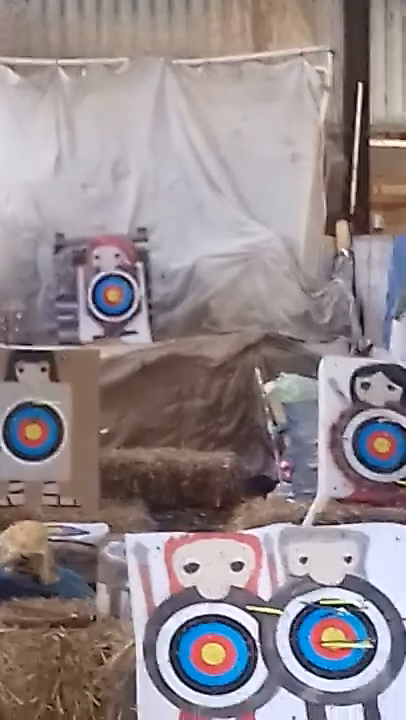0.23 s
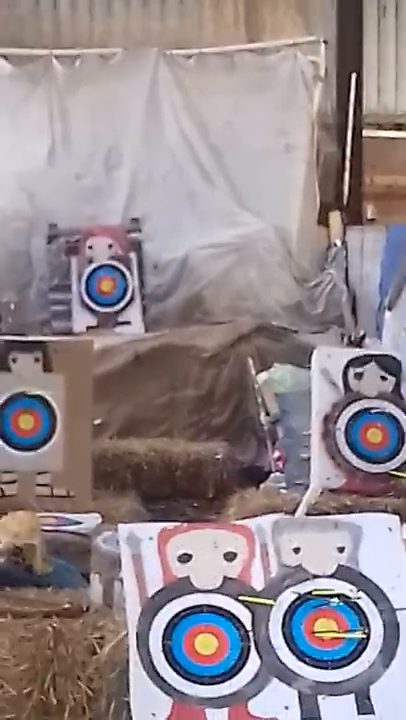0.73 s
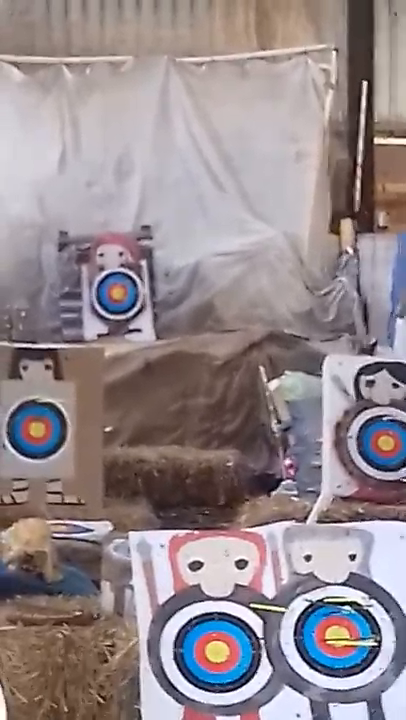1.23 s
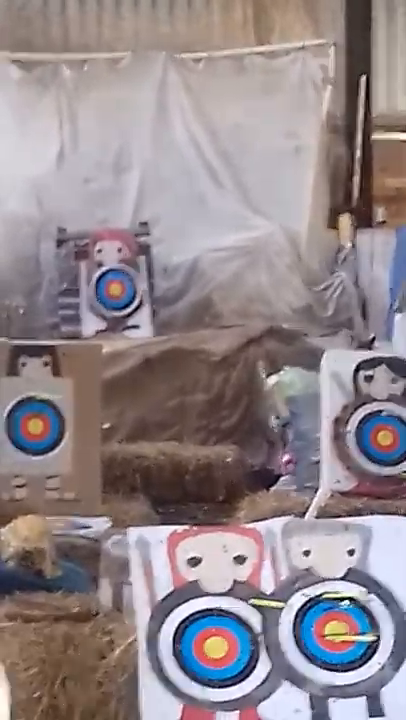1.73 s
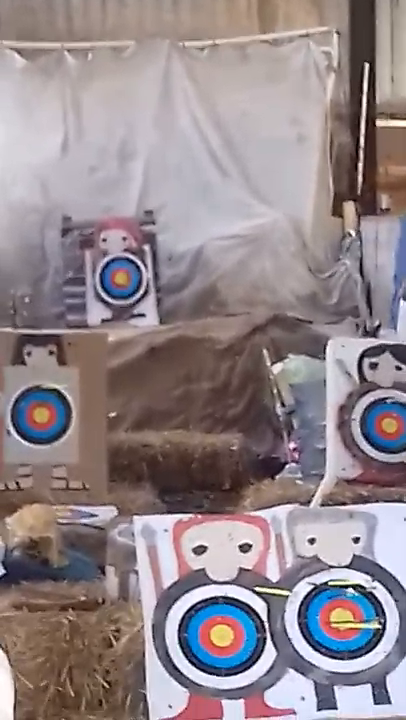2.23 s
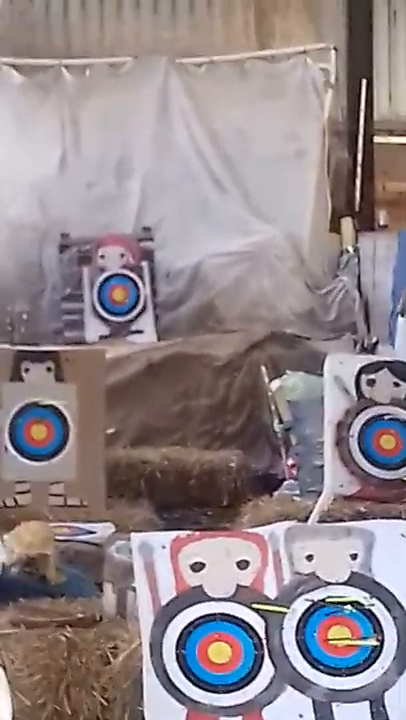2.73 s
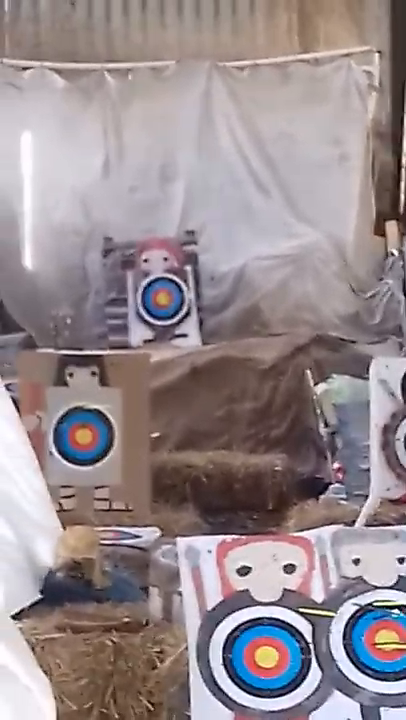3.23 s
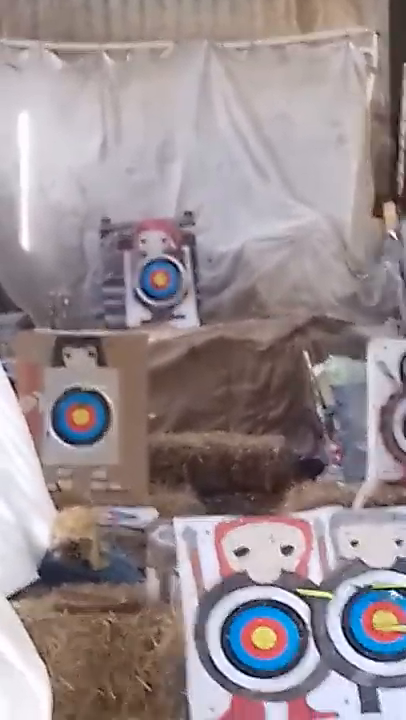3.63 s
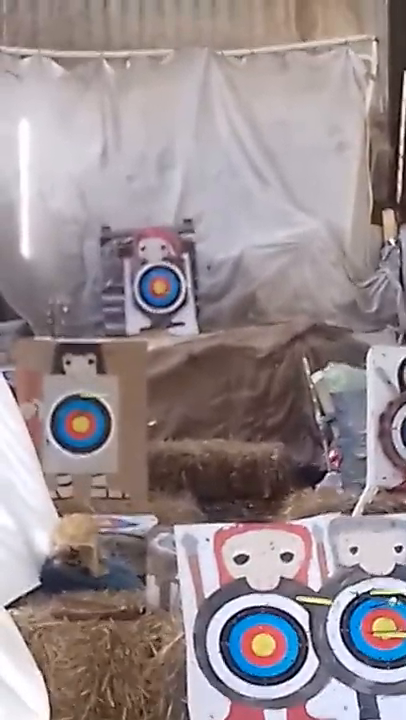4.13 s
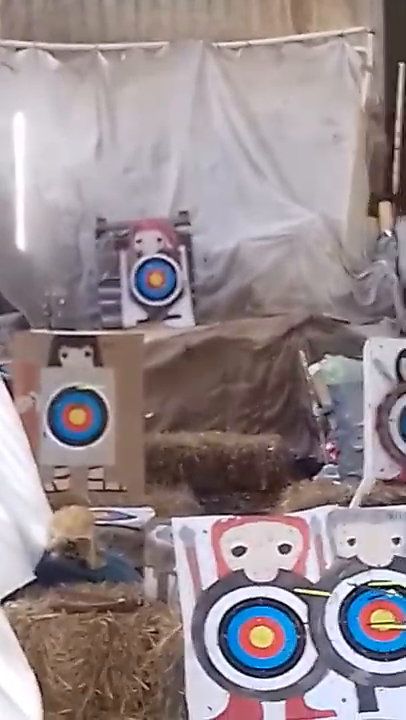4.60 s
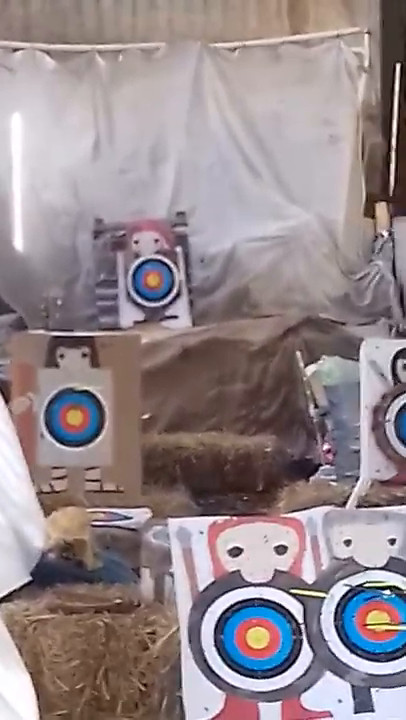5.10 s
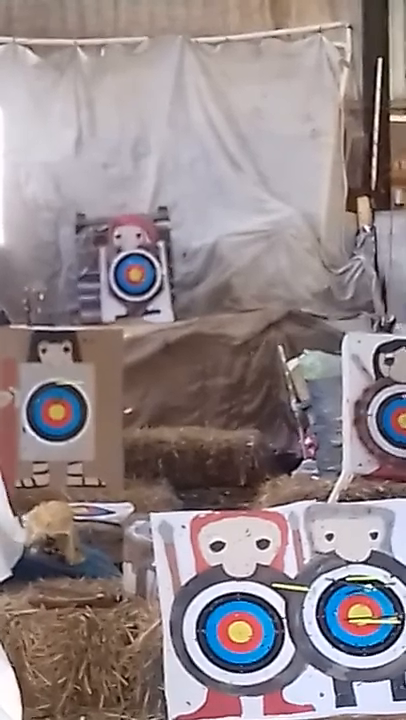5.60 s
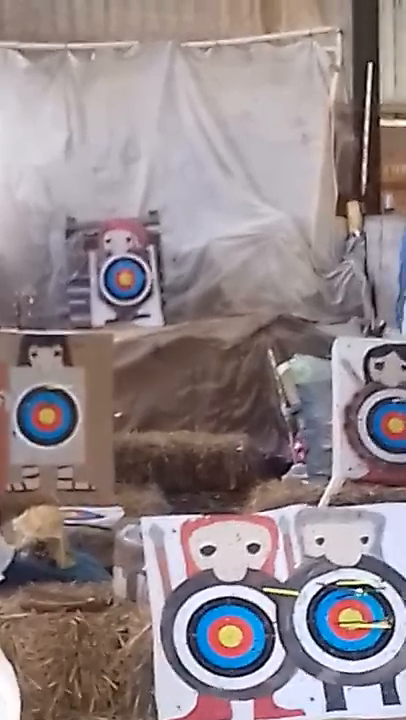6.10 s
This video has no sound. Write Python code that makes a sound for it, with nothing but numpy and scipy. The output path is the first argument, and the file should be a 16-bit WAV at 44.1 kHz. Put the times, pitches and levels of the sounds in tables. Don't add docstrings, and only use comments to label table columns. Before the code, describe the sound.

A quiet barn archery range, miked from some metres away, with steady hiss and a low, muffled traffic drone throughout; tyres faintly swish past near 0.6, 2.5, 3.3 and 6.2 s. At 1.25 s arrow shafts tick and clack softly. At 2.53 s a nock snaps onto the string with a light ring. At 2.8 s a wooden frame is knocked sharply, ringing hollow, with a much softer rebound at 2.87 s. Tiny dry ticks scatter from 3.0 to 3.5 s. Around 4.1 s a faint low motor hum comes in, and a thin string creak grows until 4.8 s. At 5.25 s the bow releases with a crisp crack and brief airy rush, the string slaps at 5.34 s, and small clicks follow. At 5.77 s the arrow thwacks cardboard, by far the loudest sound, with a short board ring and roughly half-second echo. Small ticks follow at 6.16 and 6.32 s.

```python
import sys
import numpy as np
from scipy import signal
from scipy.fft import rfft, irfft, next_fast_len
from scipy.io import wavfile
from scipy.ndimage import uniform_filter1d

SR = 44100
rng = np.random.default_rng(int(sys.argv[2]) if len(sys.argv) > 2 else 0)


def decibels_to_gain(level_db):
    exponent = np.asarray(level_db, float) / 20
    return 10 ** exponent


def file_out(sig):
    cols = np.atleast_2d(sig).T
    lim = np.clip(cols, -1, 1)
    pcm = np.round(lim * 32767).astype(np.int16)
    wavfile.write(sys.argv[1], SR, pcm)


N = 280123

# (time [s], level [dB], rise [ms], fall [ms], barn share [dB])
THWACK = (5.7697, -21.5, 4.0, 11.0, 2)
# (time [s], level [dB], rise [ms], fall [ms], barn share [dB])
RELEASE = (5.249, -32, 10.0, 4.0, -1.5)


def level(x, db):
    return x * decibels_to_gain(db) / np.sqrt(np.mean(x ** 2))


def curve(table, hz):
    f, value = np.transpose(table)
    return np.interp(np.log(hz + 1), np.log(f), value)


def shape(x, gain):
    n = next_fast_len(x.shape[-1])
    hz = np.arange(n // 2 + 1) * SR / n
    return irfft(rfft(x, n) * gain(hz), n)[..., :x.shape[-1]]


def bands(x, centres):
    def gain(f):
        octaves_away = np.log2((f + 1) / centres[:, None])
        return np.cos(np.pi / 2 * np.clip(octaves_away, -1, 1)) ** 2
    return shape(x, gain)


def causal(colour, size=1024):
    hz = np.arange(size + 1) * SR / (2 * size)
    cepstrum = irfft(np.log(decibels_to_gain(curve(colour, hz))))
    cepstrum[1:size] *= 2
    cepstrum[size + 1:] = 0
    return irfft(np.exp(rfft(cepstrum)))[:size]


def walk(rate):
    k = int(SR / rate)
    steps = np.repeat(rng.standard_normal(N // k + 1), k)
    return 1.3 * uniform_filter1d(uniform_filter1d(steps, k), k)[:N]


def swell(s, db, rise, hold, fall):
    t = np.arange(N) / SR - s
    return db - 20 * np.maximum(0, np.maximum(-t / rise, (t - hold) / fall))


def nearness(s, half):
    return 1 / (1 + ((np.arange(N) / SR - s) / half) ** 2)


def add(track, s, x):
    i = int(s * SR)
    track[i:i + len(x)] += x[:N - i]


def capsules():
    # (frequency [Hz], level [dB per Hz])
    capsule_colour = [(25, -16), (45, -10), (100, -1), (140, 0), (1200, -1), (2800, -3), (3700, -8),
                      (4800, -24)]

    def gain(f):
        return decibels_to_gain(curve(capsule_colour, f)) * np.minimum(4800 / (f + 1), 1) ** 8
    return level(shape(rng.standard_normal((2, N)), gain), -66)


def hiss():
    # (frequency [Hz], level [dB per Hz])
    hiss_colour = [(2500, -6), (5000, -2), (7000, 0), (9000, 0), (12500, 1), (15700, -1)]
    # (frequency [Hz], width [Hz], depth [0-1])
    notches = [(10000, 500, .7), (15000, 250, .7)]
    lift_db, sink_s = 2.5, .5
    since = np.arange(N) / SR - np.array([[RELEASE[0]], [THWACK[0]]])
    lift = lift_db * np.max((since > 0) * np.exp(-np.abs(since) / sink_s), axis=0)

    def gain(f):
        dips = np.prod([1 - depth / (1 + ((f - hz) / width) ** 2) for hz, width, depth in notches], axis=0)
        return decibels_to_gain(curve(hiss_colour, f)) * dips * np.minimum(f / 2500, 1) ** 2 * (f < 16000)
    mid, side = rng.standard_normal((2, N))
    both = np.array([mid + .92 * side, mid - .92 * side])
    return level(shape(both, gain), -74.5) * decibels_to_gain(lift)


def traffic():
    # (frequency [Hz], level [dB per Hz])
    drone_colour = [(15, -46), (30, -26), (45, -23), (75, -14), (160, -8), (330, -7.5), (500, -10),
                    (620, -5), (890, 0), (1420, -8), (2330, -21), (3500, -22), (4300, -35), (6000, -55)]
    # (time nearest [s], half-length [s], level [dB], tyre pitch [Hz], width [Hz])
    passes = [(.6, .4, -76.5, 3750, 550), (2.55, .55, -69, 2800, 900), (3.3, .3, -70, 3000, 900),
              (6.2, .5, -71, 2900, 1000)]
    centres = 17.5 * 2 ** np.arange(9)
    lull_db = -1.6 * nearness(.6, .45)
    tyre_bed_db = -2
    swell_db = [lull_db + tyre_bed_db * (hz > 1700) + .8 * walk(6) for hz in centres]
    drone = shape(rng.standard_normal(N), lambda f: decibels_to_gain(curve(drone_colour, f)))
    sound = level(np.sum(decibels_to_gain(swell_db) * bands(drone, centres), axis=0), -52.6)
    for s, half, db, hz, width in passes:
        tyres = shape(rng.standard_normal(N), lambda f: 1 / (1 + ((f - hz) / width) ** 4))
        sound += level(tyres, db) * nearness(s, half)
    return sound


def motor():
    # (time at full [s], level of the fundamental [dB], rise [s], hold [s], fall [s])
    running = (4.35, -67.5, .3, 1.4, .4)
    # (time at full [s], level [dB], rise [s], hold [s], fall [s])
    load = (5.38, -63, .15, .4, 2.5)
    hum_hz, sag_hz_per_s = 150, 1.6
    hz = hum_hz - sag_hz_per_s * (np.arange(N) / SR - running[0])
    phase = 2 * np.pi * np.cumsum(hz * (1 + .002 * walk(3))) / SR
    first_db, third_db = swell(*running), swell(*load)
    hum = decibels_to_gain(first_db) * np.sin(phase)
    hum += decibels_to_gain(first_db - 9) * np.sin(2 * phase)
    hum += decibels_to_gain(third_db) * np.sin(3 * phase)
    return np.sqrt(2) * hum


def rush(db, hz, width, order=4):
    slips = rng.standard_normal(N) * decibels_to_gain(2.5 * rng.exponential(size=N))
    return level(shape(slips, lambda f: 1 / (1 + ((f - hz) / width) ** order)), 0) * decibels_to_gain(db)


def string_and_air():
    # (time at full [s], level [dB], rise [s], hold [s], fall [s])
    draw = (4.59, -71, .45, .19, .03)
    wind_up = (5.238, -52, .01, .013, .006)
    flight = (5.259, -59, .012, .136, .02)
    sound = rush(swell(*draw), hz=2760, width=220)
    sound += rush(swell(*wind_up), hz=2800, width=700)
    return sound + rush(swell(*flight), hz=4100, width=1500, order=10)


def barn(size=24000):
    # (frequency [Hz], time [s])
    echo_times = [(100, .42), (260, .5), (700, .48), (1500, .6), (2800, .7), (4200, .56), (7000, .6),
                  (12000, .4)]
    t = np.arange(size) / SR
    lumps_db = 17 * uniform_filter1d(rng.standard_normal(size), 90)
    centres = 60 * 2 ** np.arange(9)
    fade_db = -60 * t / curve(echo_times, centres)[:, None]
    echo = np.sum(bands(rng.standard_normal(size) * decibels_to_gain(lumps_db), centres) * decibels_to_gain(fade_db), axis=0)
    echo *= (1 - np.exp(-t / .005)) * (1 + .5 * np.exp(-t / .05))
    return echo / np.sqrt(np.sum(echo ** 2))


def ticks(near, far):
    # (time [s], peak level [dB], pitch [Hz])
    rest_ticks = [(1.2411, -51, 2390), (3.0365, -50, 2590), (3.057, -49, 2510), (3.1433, -51, 2500),
                  (3.1827, -50, 2490), (3.2326, -54, 2410), (3.3388, -51, 2590), (3.4594, -54, 2510),
                  (3.5209, -54, 2530), (6.1619, -51, 2630)]
    # (time [s], peak level [dB], pitch [Hz], ring [ms], upper ring [dB])
    sharp_cracks = [(2.797, -25, 3100, 2.2, -30), (3.0155, -42, 900, 3, -20), (5.254, -28, 2300, 1.2, -20),
                    (5.2587, -26, 3200, 1.4, -16), (5.3605, -34, 2400, 1, -14), (5.37, -31, 2800, 1.2, -14),
                    (5.537, -27, 2900, .6, -13), (5.7696, -16, 3000, 1.5, -22),
                    (6.3245, -34, 3050, .7, -13)]
    # (time [s], peak level [dB])
    sparks = [(2.5312, -57), (5.257, -53), (5.263, -55), (5.5375, -52), (5.77, -52), (5.773, -54),
              (5.803, -52)]
    # (frequency [Hz], level [dB per Hz])
    tick_colour = [(880, -36), (1500, -6), (1930, -15), (2970, 3), (4080, -19), (4730, -16), (6150, -33),
                   (11400, -29), (14000, -33)]
    spark_colour = [(3000, -30), (6000, -6), (9000, -3), (10000, -12), (11500, 0), (15500, -3)]
    t = np.arange(SR // 50) / SR
    click = causal(tick_colour)[:len(t)]
    click /= np.max(np.abs(click))
    contact = 1 - np.exp(-(t / .0004) ** 2)
    small = [row + (3.5, -2.5) for row in rest_ticks]
    for rows, ratio, barn_db in ((small, 1.38, -3), (sharp_cracks, 1.55, -12)):
        for s, db, hz, ring_ms, upper_db in rows:
            ring = np.sin(2 * np.pi * hz * t) + decibels_to_gain(upper_db) * np.sin(2 * np.pi * ratio * hz * t)
            ring *= np.exp(-t * 1000 / ring_ms)
            tick = decibels_to_gain(db) * (.8 * contact * ring + .2 * click)
            add(near, s, tick)
            add(far, s, tick * decibels_to_gain(barn_db))
    for s, db in sparks:
        spark = np.convolve(rng.standard_normal(len(t)) * np.exp(-t / .001), causal(spark_colour))
        add(near, s, spark * decibels_to_gain(db) / np.max(np.abs(spark)))


def blow(near, row, colour, modes, ring_db):
    s, db, rise_ms, fall_ms, barn_db = row
    t = np.arange(SR // 2) / SR
    swing = np.minimum(t * 1000 / rise_ms, 1)
    push = swing * np.exp(-np.maximum(t * 1000 - rise_ms, 0) / fall_ms)
    cracks = push * rng.standard_normal(len(t)) * decibels_to_gain(2.5 * rng.exponential(size=len(t)))
    click = causal(colour)
    body = np.convolve(cracks[:SR // 8], click)
    ring = np.zeros(len(t))
    for hz, mode_db, t60 in modes:
        wobble = uniform_filter1d(uniform_filter1d(rng.standard_normal(len(t)), 400), 400)
        wobble_db = 2 * np.sqrt(600) * wobble
        ring += decibels_to_gain(mode_db + wobble_db - 60 * t / t60) * np.sin(2 * np.pi * hz * t)
    energy = decibels_to_gain(db) * np.sqrt(.01 * SR)
    echo = signal.fftconvolve(click, barn()) / np.linalg.norm(click)
    add(near, s, body * energy / np.linalg.norm(body))
    add(near, s, swing * ring * decibels_to_gain(db + ring_db))
    add(near, s + .7 * rise_ms / 1000, echo * energy * decibels_to_gain(barn_db))



def shafts_clack(near):
    row = (1.2835, -45, 2.2, 5.0, -2.5)
    colour = [(400, -30), (1090, -4), (1800, -10), (2400, -1), (2900, -6), (3450, -2), (4300, -22),
              (7000, -48), (12000, -80)]
    rings = [(2400, 0, .15), (3400, -1, .15)]
    blow(near, row, colour, rings, ring_db=-10)


def nock_snaps(near):
    row = (2.531, -45, 1.4, 6.0, 1.5)
    colour = [(120, -34), (200, -4), (488, -15), (822, 0), (1360, -13), (1490, -18), (3000, -14),
              (3280, -10), (7000, -50), (9100, -80), (15400, -120)]
    rings = [(3220, 3, .45), (4250, -6, .25), (850, -1, .15)]
    blow(near, row, colour, rings, ring_db=-9.5)


def frame_knock(near):
    knock = (2.7928, -33, 4.0, 5.0, -6.5)
    rebound = (2.87, -56, 8.0, 8.0, -9.0)
    colour = [(40, -34), (80, -20), (280, -24), (500, -12), (1100, -3), (2000, -11), (2500, -17),
              (3300, -10), (4500, -40), (9000, -60), (12000, -70)]
    rings = [(429, 1.5, .25), (438, -2.5, .3), (459, -9, .3), (583, -13, .25), (711, -2.5, .22),
             (775, -4, .45), (931, -10, .25), (1066, -10, .4), (1092, -3, .24), (1281, -10, .25),
             (1385, -11, .25), (1523, -11, .25)]
    blow(near, knock, colour, rings, ring_db=.5)
    blow(near, rebound, colour, rings, ring_db=4)


def bow_shot(near):
    slap = (5.343, -35.5, 25.0, 15.0, -4)
    release_colour = [(40, -40), (90, -20), (330, -3), (740, -14), (900, -5), (1270, -3), (2200, -4),
                      (3400, -5), (4600, -26), (6500, -34), (9000, -48), (15600, -56)]
    slap_colour = [(300, -35), (560, -18), (700, -2), (850, -2), (1210, -13), (1900, -12), (3400, -11),
                   (4300, -30), (7000, -55), (12000, -80)]
    rings = [(845, 0, .2), (1025, -3, .2)]
    blow(near, RELEASE, release_colour, rings, ring_db=-22)
    blow(near, slap, slap_colour, rings, ring_db=-7)


def arrow_hits_board(near):
    colour = [(50, -44), (110, -27), (195, -5), (400, -10), (600, -12), (720, -2), (850, -3), (1200, -13),
              (2540, -16), (3550, -11), (4100, -24), (5200, -40), (8500, -50), (11000, -68)]
    rings = [(78, -27, .5), (197, -8, .2), (640, -3, .13), (3620, -8, .25), (268, -10, .2), (334, -12, .3),
             (430, -12, .2), (699, -2, .15), (812, 0, .25), (883, -3, .3), (1047, -6, .2), (3432, -8, .2)]
    blow(near, THWACK, colour, rings, ring_db=-5)


def scene():
    near, far = np.zeros((2, N))
    ticks(near, far)
    shafts_clack(near)
    nock_snaps(near)
    frame_knock(near)
    bow_shot(near)
    arrow_hits_board(near)
    shots = near + signal.fftconvolve(far, barn())[:N] + string_and_air()
    return shots + traffic() + motor() + hiss() + capsules()


def roll_off(x):
    return signal.sosfilt(signal.butter(12, 15600, fs=SR, output="sos"), x)


def record(dry):
    ceiling, offset = .27, -.0006
    held = dry / (1 + np.abs(dry / ceiling) ** 6) ** (1 / 6)
    return roll_off(held + offset)


dry = scene()
out = record(dry)
file_out(out)
```